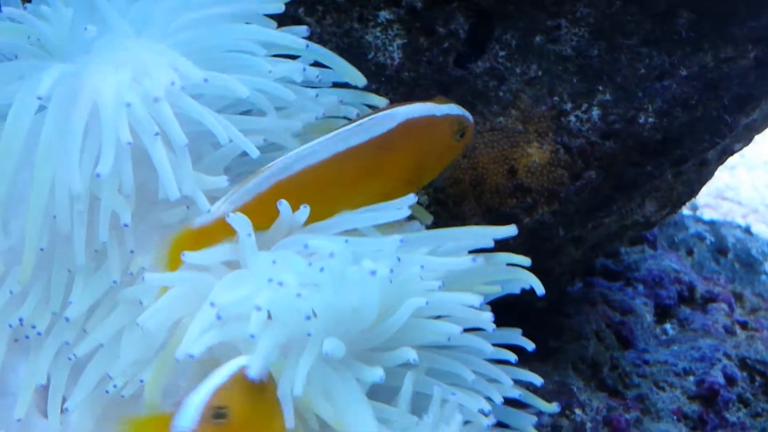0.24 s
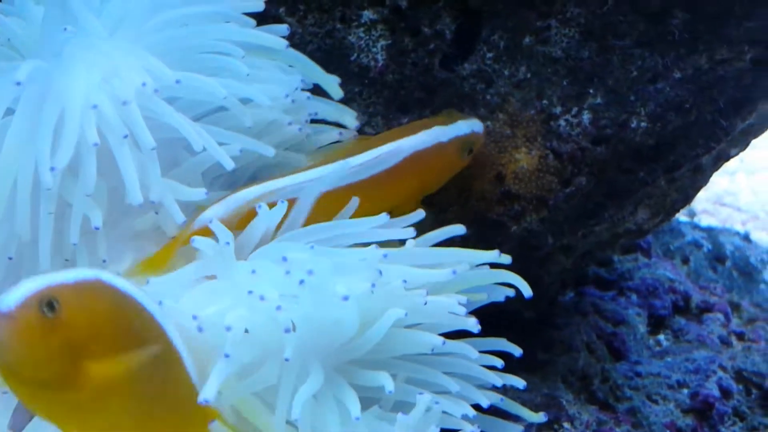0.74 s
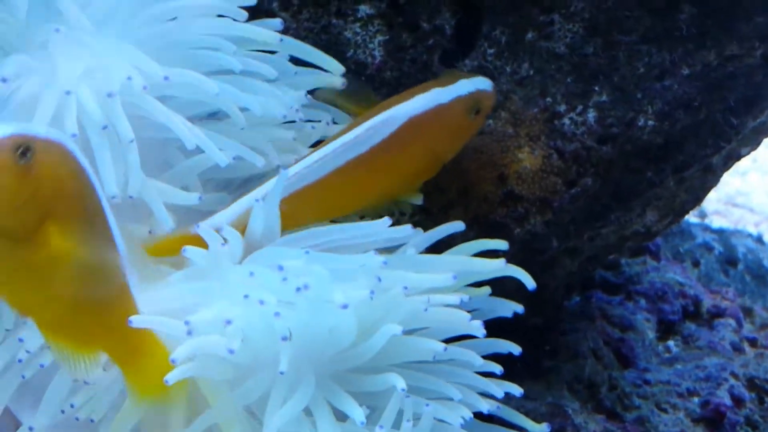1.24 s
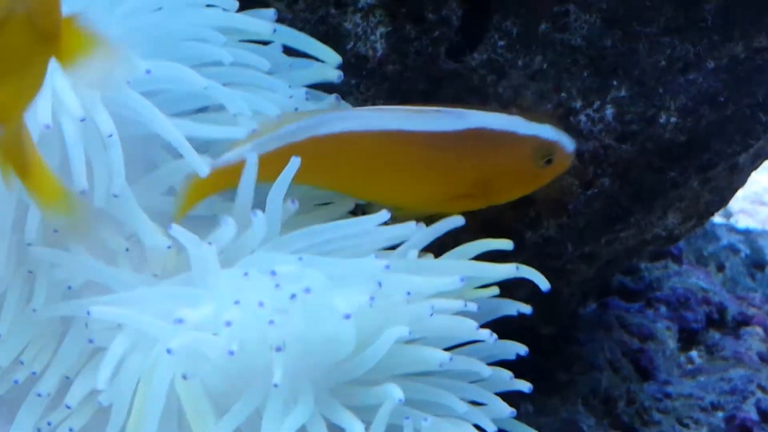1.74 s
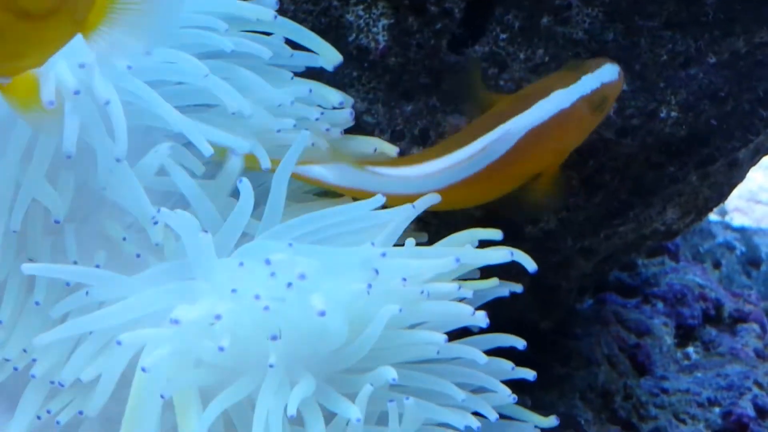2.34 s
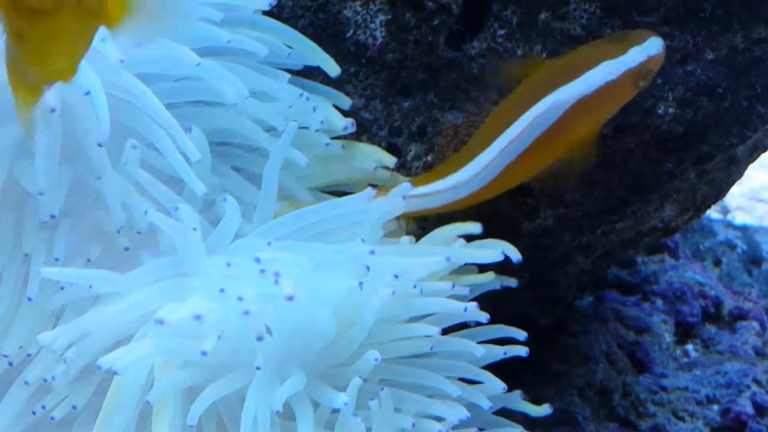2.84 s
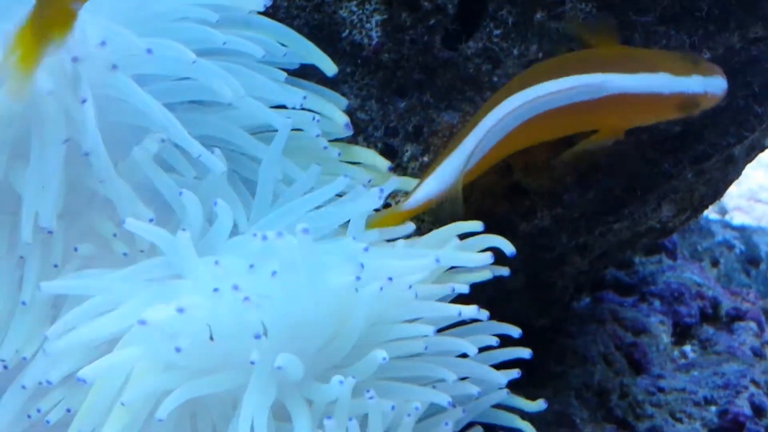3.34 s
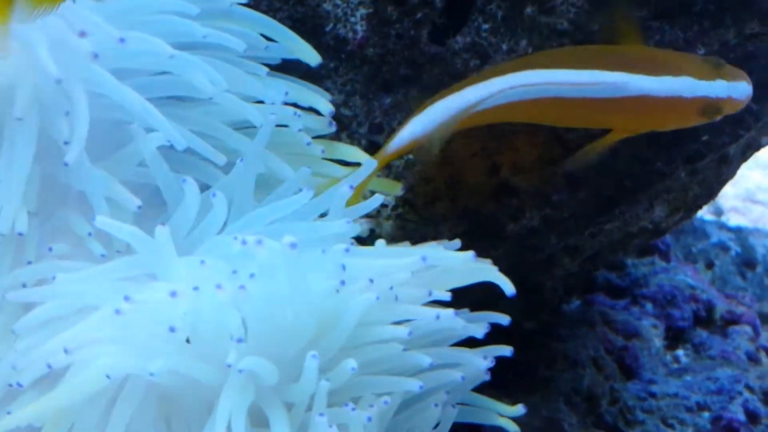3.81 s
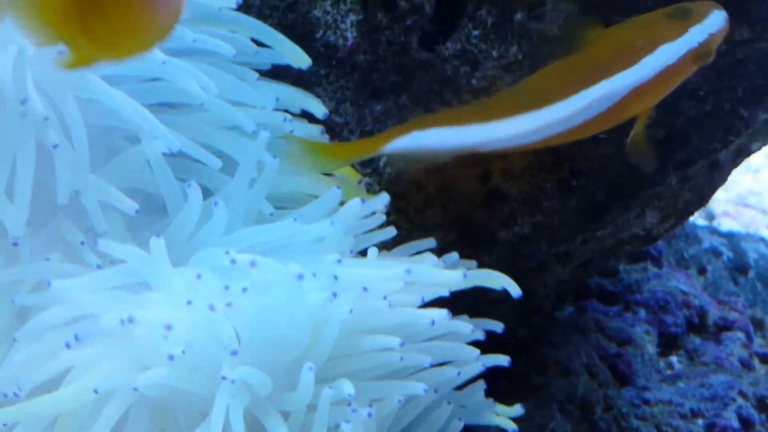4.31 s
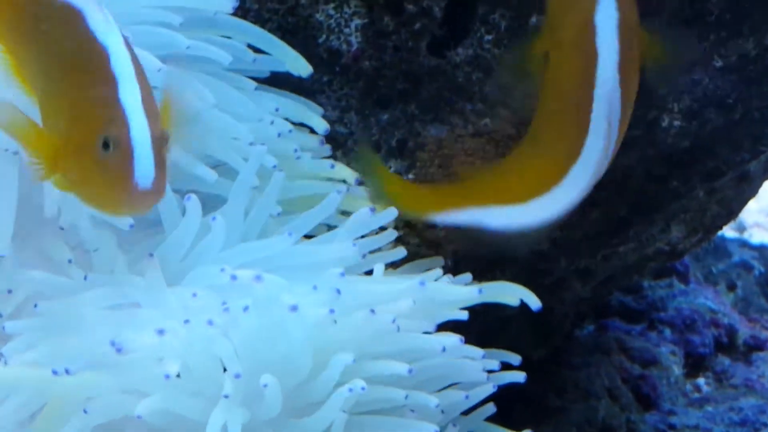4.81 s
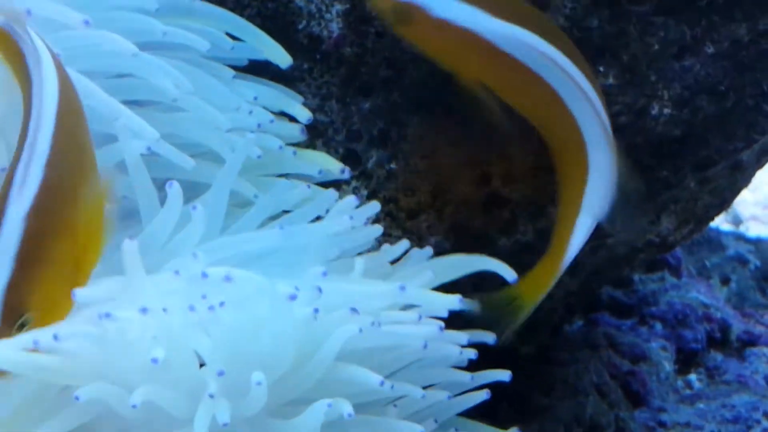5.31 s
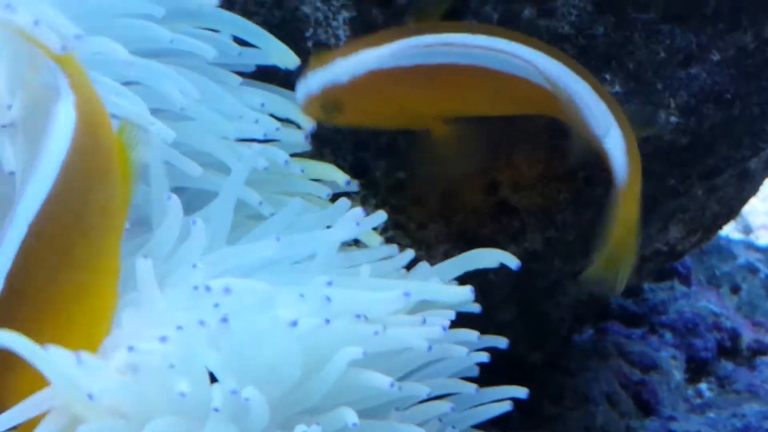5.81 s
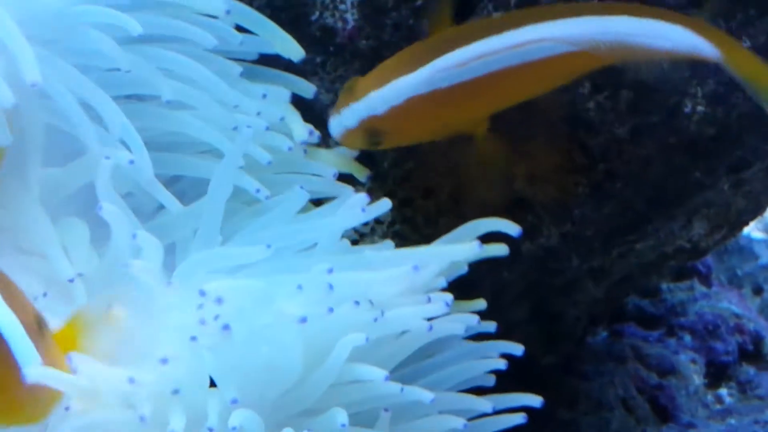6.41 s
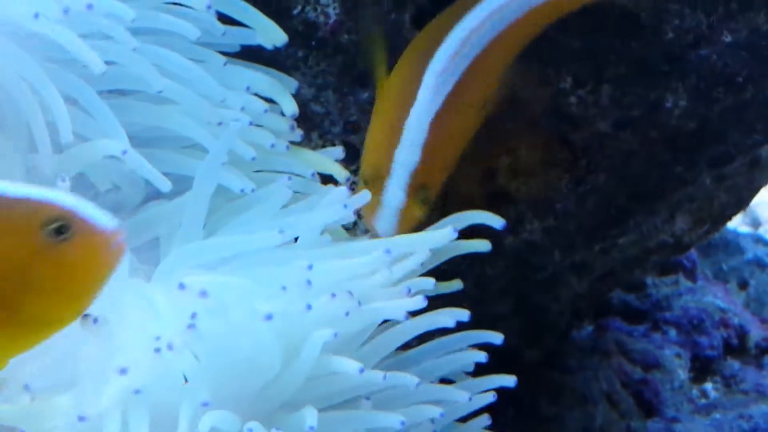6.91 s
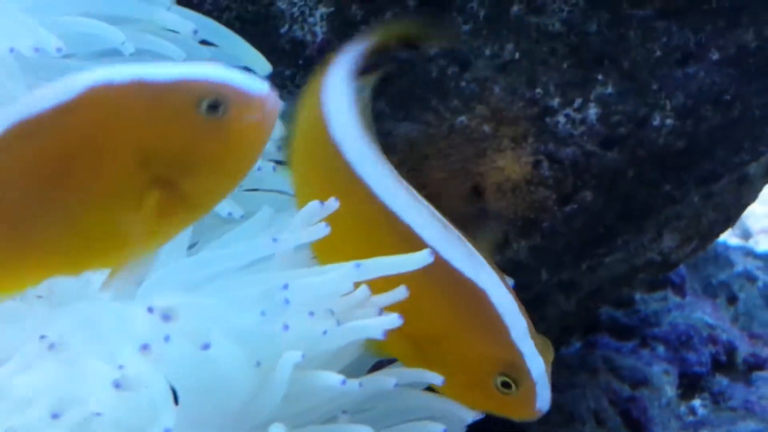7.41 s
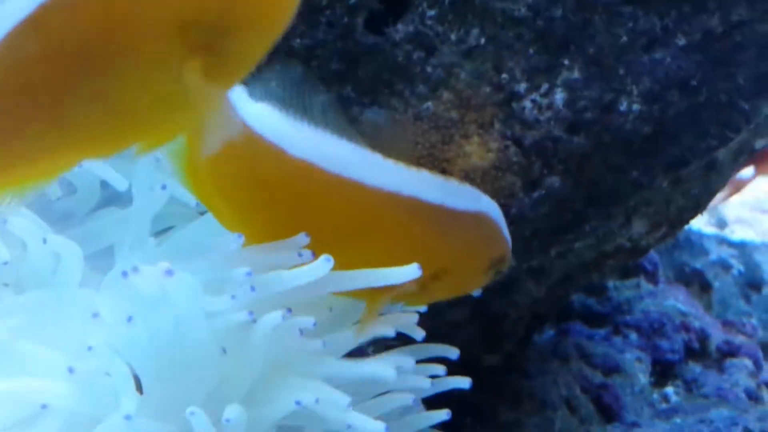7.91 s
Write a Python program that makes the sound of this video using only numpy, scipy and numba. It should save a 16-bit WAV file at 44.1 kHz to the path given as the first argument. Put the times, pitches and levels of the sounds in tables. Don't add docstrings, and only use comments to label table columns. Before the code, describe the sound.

A small indoor aquarium heard from very close to the glass. From start to end a low mains hum from the pumps runs beneath everything, throbbing quickly and unevenly as the impellers drift against each other, over soft room and cabinet rumble. Water trickles quietly as a fine, hissing fizz of tiny bubbles, with small high splashes and specks of spray scattered throughout, a little busier around 2.9 and 6.7 seconds. Sharp, dry ticks sound at irregular gaps of about a quarter second from 0.05 to 1.2, then once near 1.8. A single small drip rings at 1.6. The ticks stay away until about 3.7, then return every 0.2 to 0.4 seconds until 6.4, alternating between thin scrapes and firmer knocks, brightest on the right and hollow on the left. Afterwards only hum, throb and trickling water continue to about 8 seconds.

```python
import sys
import numpy as np
from scipy import signal
from scipy.fft import rfft, irfft, next_fast_len
from scipy.io import wavfile
from scipy.ndimage import uniform_filter1d
from numba import njit

SR = 44100
rng = np.random.default_rng(int(sys.argv[2]) if len(sys.argv) > 2 else 0)


def inscribe(sig):
    pcm = np.round(np.clip(np.atleast_2d(sig).T, -1, 1) * 32767)
    wavfile.write(sys.argv[1], SR, pcm.astype(np.int16))


def voltage_ratio(decibels):
    exponent = np.asarray(decibels, float) / 20
    return 10 ** exponent


N = 359415
BLOCK, BLOCK_START = 1024, 87

# f/Hz, left level/dB per Hz, right level/dB per Hz
RUMBLE = [(25, -92, -90), (45.3, -82, -89), (66.4, -76, -66.5), (84, -68, -72.5), (126, -71, -66),
          (205, -60.5, -59), (261, -67, -66.5), (312, -73.5, -68), (359, -73, -78.5), (487, -79.5, -74.5),
          (625, -81, -83), (784, -81.5, -80), (1100, -82.5, -82), (1600, -76, -80)]
# f/Hz, left level/dB, right level/dB, left lead/rad
HUM = [(100.0, -44.0, -46.5, -0.1), (200.0, -41.3, -40.2, -0.1), (300.0, -53.4, -51.2, -0.4),
       (400.1, -60.5, -58.9, -0.7), (500.1, -57.3, -59.0, 0.2), (600.1, -68.9, -69.8, -0.3),
       (700.2, -67.4, -72.1, -0.5), (800.2, -60.1, -63.8, -1.3), (900.2, -61.4, -68.2, -2.0),
       (1000.2, -63.6, -63.2, -1.0), (1100.2, -76.2, -65.9, 0.6), (1200.2, -72.0, -64.5, -0.8),
       (1400.3, -73.0, -75.6, -0.6), (1500.3, -80.7, -74.2, 2.2), (1600.3, -73.1, -76.9, -1.0),
       (304.7, -57.3, -57.7, -0.1), (360.1, -67.5, -67.5, -0.1), (609.6, -65.2, -69.5, -0.6),
       (1066.8, -73.2, -67.5, -0.4), (1168.6, -75.2, -84.0, -0.4), (1219.3, -65.5, -71.2, -1.8),
       (1320.7, -72.0, -72.0, -1.0), (1371.6, -58.5, -79.1, -2.8), (1422.2, -66.1, -80.1, -1.3),
       (1980.6, -77.0, -70.1, -1.4)]
# t/s, level/dB
SWELL = [(0.05, -60), (0.1, -65), (0.38, -54.5), (0.7, -61), (1.0, -55), (1.4, -63.3), (2.09, -54.5),
         (2.48, -63), (3.2, -56), (3.66, -60.5), (4.07, -54.6), (4.34, -62), (4.61, -53.5), (5.64, -68),
         (6.86, -56.5), (7.15, -63), (8.11, -57.4)]
# t/s, level/dB
THROBS = [(-0.025, -43), (0.141, -38), (0.29, -34.5), (0.48, -45), (0.585, -41.5), (0.722, -41.5),
          (0.88, -34.5), (0.994, -36.5), (1.15, -36.5), (1.285, -44), (1.429, -37.5), (1.544, -36),
          (1.8, -55), (2.023, -41), (2.18, -41), (2.299, -48), (2.411, -39), (2.551, -37.5), (2.646, -36),
          (2.776, -34), (2.932, -43), (3.052, -28.5), (3.16, -38), (3.249, -38), (3.374, -36.5),
          (3.47, -35.5), (3.651, -58), (3.807, -34), (3.899, -34.5), (4.028, -57), (4.153, -42.5),
          (4.368, -43), (4.43, -40.5), (4.616, -32.5), (4.787, -43), (4.88, -40.5), (4.989, -39),
          (5.08, -37.5), (5.214, -38), (5.338, -34), (5.465, -40.5), (5.602, -65), (5.808, -69),
          (6.04, -42), (6.175, -39.5), (6.465, -54), (6.541, -36.5), (6.757, -38.5), (6.851, -42),
          (7.018, -62), (7.163, -44), (7.249, -33.5), (7.424, -46.5), (7.505, -41), (7.589, -41.5),
          (7.767, -36), (7.877, -34), (7.991, -54), (8.085, -30.5), (8.24, -33)]
# t/s, level/dB
SLOW_LOAD = [(0.05, -37.5), (0.51, -58.5), (0.63, -35), (0.72, -53.3), (0.79, -51), (0.9, -50), (1.09, -55),
             (1.18, -52), (1.35, -44.5), (1.76, -54), (1.88, -45.5), (2.26, -61), (2.47, -39), (2.6, -52),
             (2.84, -36), (3.06, -51), (3.15, -47), (3.26, -60), (3.39, -41), (3.64, -61), (3.78, -41.5),
             (3.94, -63), (4.13, -37), (4.27, -49), (4.43, -39), (4.59, -51), (4.78, -51.8), (4.87, -55),
             (5.27, -42.5), (5.56, -45.5), (5.8, -42.5), (5.99, -53), (6.11, -43.5), (6.4, -53),
             (6.5, -52.8), (6.6, -64), (6.76, -44), (6.91, -58), (7.13, -46), (7.65, -48), (8.11, -45)]
WHIRR_HZ = (63, 140, 250, 350, 450, 551, 1450, 1980, 2350, 850, 1058)
# width/Hz, left level/dB, right level/dB
WHIRR = [(18, -71, -87), (4.97, -51.5, -54), (5.97, -59.5, -53), (3.6, -57.5, -55.5), (3.9, -59, -59.5),
         (10.3, -59, -59), (63, -59, -80), (56.7, -64, -69.5), (114, -63, -61.5), (4, -69, -70),
         (15.6, -65.5, -62)]
WHIRR_SHARE = (0, 0, .2, .4, .6, .3, 0, 0, 0, 0, 0)
# f/Hz, left level/dB per Hz, right level/dB per Hz
TRICKLE = [(1824, -87, -82), (2270, -90.5, -88), (2500, -90.5, -88.5), (3000, -92, -90), (3810, -93, -93.5),
           (4460, -87.5, -93), (4840, -89, -92.5), (5700, -85, -92.5), (6800, -89.5, -88.5),
           (6870, -93.5, -91), (8400, -99, -90.5), (11600, -102, -97.5), (14900, -106, -99),
           (15400, -108, -101)]
# t/s, level/dB
FLOW = [(0.0, -53.5), (0.82, -54.5), (1.04, -53), (1.84, -55), (2.13, -52.5), (2.43, -54.5), (3.18, -53),
        (3.81, -53), (3.95, -53), (4.27, -53), (5.31, -54.5), (6.35, -53.5), (6.45, -54.5), (8.15, -54.5)]
# t/s, f/Hz, level/dB, length/ms
SPLASHES = [(0.181, 5650, -42, 7), (0.224, 5470, -36.5, 6), (0.922, 6340, -42, 9.9),
            (1.035, 6540, -42.5, 9), (1.942, 6940, -45, 7.6), (1.994, 5900, -38.5, 20),
            (2.143, 5700, -42.5, 14), (2.648, 4400, -41, 9), (2.661, 6930, -39, 9.1),
            (2.892, 5400, -36, 14), (2.9, 3000, -40, 14), (3.065, 6500, -38, 7.8), (3.415, 4300, -46, 13),
            (3.92, 5700, -39, 7), (4.114, 4930, -42, 8.9), (4.192, 5160, -40.5, 14), (4.274, 6180, -38, 27),
            (4.38, 6370, -42, 13), (4.429, 6500, -43, 11), (4.903, 5700, -42, 6), (5.712, 6600, -40, 18),
            (5.757, 5000, -39, 4.9), (5.887, 6400, -42, 15), (5.92, 6890, -41, 23),
            (6.331, 6100, -39.5, 11), (6.445, 6500, -41, 9.7), (6.656, 6340, -42, 9.4),
            (6.753, 4340, -41, 10), (6.862, 4270, -42, 8.3), (6.861, 5570, -43.5, 11),
            (6.724, 5500, -45, 22), (2.893, 2530, -42.5, 10), (2.893, 3670, -44, 14),
            (4.118, 7800, -47, 18), (2.915, 5190, -38, 16), (6.274, 5840, -49, 11), (6.729, 4370, -44, 13),
            (7.776, 5700, -41.5, 9)]
# t/s, f/Hz, level/dB
MORE_SPLASHES = [(0.649, 8960, -46), (1.012, 9050, -48), (1.208, 7500, -45), (2.35, 9150, -47), (2.419, 10760, -47),
                 (2.459, 9990, -49), (2.583, 10400, -49), (3.036, 7870, -46), (3.289, 9700, -45),
                 (3.337, 7400, -47), (3.531, 8300, -46), (4.118, 8650, -52), (4.299, 8400, -49),
                 (4.595, 10130, -47), (4.785, 10680, -47), (4.937, 9900, -49), (5.432, 10600, -45),
                 (5.548, 9150, -44), (6.01, 7300, -46), (6.096, 7300, -46), (6.198, 9820, -47), (6.293, 8600, -45),
                 (6.41, 6500, -50), (2.897, 4200, -48), (6.757, 5600, -46), (6.799, 7400, -47), (7.1, 9300, -45),
                 (7.359, 4700, -43), (7.511, 7240, -45), (8.016, 9350, -46), (3.0235, 6570, -45),
                 (1.127, 5840, -49), (1.303, 5400, -48), (2.532, 5960, -47), (2.613, 6000, -46), (4.631, 6040, -42),
                 (4.956, 5570, -44), (5.119, 5660, -46), (6.976, 5450, -43.5), (6.91, 5800, -48), (6.80, 5900, -52),
                 (2.94, 5350, -45), (0.25, 6100, -45), (3.718, 5700, -45), (4.877, 5900, -50), (4.99, 6300, -44),
                 (6.243, 5200, -46), (3.416, 5500, -47)]
# f/Hz, left minus right level/dB
PORTS = [(3300, 5), (4200, 8), (6100, 8.5), (6700, 2.5), (7300, -1), (9500, -3)]
# t/s, f/Hz, left level/dB, right level/dB, time to fall by 60 dB/s
DRIP = (1.599, 3420, -48, -51, .21)
# t/s, energy level/dB, scrape/ms,
# slide [0 a firm knock, 1 a thin glancing scrape]
TICKS = [(0.0517, 2, 0.83, 1.15), (0.3091, 2.5, 1, 0.11), (0.595, 1.5, 0.91, 0.99), (0.8262, 2, 0.68, .03),
         (1.091, 1.5, 1, 1.3), (1.2205, 2.5, 0.78, 0.17), (1.7653, 4, 1, 0.9), (3.6703, 3, 0.47, 0.21),
         (3.9786, 2, 0.61, 0.89), (4.267, 1.5, 0.53, .1), (4.5694, 2.8, 0.99, 1.6), (4.7436, 0.5, 0.5, .03),
         (5.0127, 3, 1.3, 1.07), (5.2125, 1, 0.47, 0.13), (5.4248, 3.5, 0.72, 1.1), (5.778, 3, 0.59, .2),
         (6.049, 3, 0.7, 0.97), (6.2248, -0.1, 0.34, 0.2), (6.4317, 3, 0.67, 0.86), (1.0964, -19, .4, 1.1),
         (3.9806, -19, .4, 1.1), (6.4343, -15, .4, 1.2)]
DEAD_HZ = (11300, 8100, 13300, 8100, 12100, 9000, 3450, 9800, 12000, 8100, 13400, 9000, 4000, 9000, 10700,
           7100, 8700, 9000, 12300, 9000, 9000, 9000)
DEAD_DB = (-12, -12, -10, 0, -11, 0, -13, -5, -6, 0, -11, 0, -9, 0, -17, -3, -4, 0, -4, 0, 0, 0)
# f/Hz, firm level/dB, glancing level/dB
HOUSING = [(4000, 1, 2.5), (5000, 0, -2.5), (6500, 4.5, -0.5), (7400, -1.5, 1.5), (10600, -5.5, 0),
           (12400, 5.5, -5), (14500, -2.5, -3)]
# f/Hz, width/Hz, firm level/dB, half-glancing level/dB, glancing level/dB
HOUSING_MODES = [(4440, 440, -1, 4, -2), (5150, 240, 2, -10, -9), (5800, 410, 0.5, -1.5, 4),
                 (6000, 130, -1, 4, -5), (6500, 300, 3.5, -10, -3), (7120, 310, -3, -4, 3.5),
                 (8100, 300, -3, -11, 0.5), (8550, 280, 5.5, 2, -7), (9800, 420, 1.5, 4, -3.5),
                 (10500, 500, 0, -2, -5), (11600, 300, -0.5, 0, -2), (12500, 400, -3, 0, 0),
                 (13700, 300, 2, -8, 0), (14500, 250, 3, 0, 2)]
# f/Hz, level/dB per Hz
GATE = [(700, -106), (1600, -93), (2500, -95.5), (3400, -96.5), (4500, -100), (6000, -98), (8500, -102),
        (11000, -105), (14500, -103.5)]
# f/Hz, left share [0-1], right share [0-1]
HOLES = [(9000, 0, 0), (10500, .15, .05), (12500, .36, .25), (14500, .42, .38)]


def unit(x):
    return x / np.sqrt(np.mean(x ** 2))


def shaped(x, hz, gain):
    length = x.shape[-1]
    size = next_fast_len(length)
    every_hz = np.arange(size // 2 + 1) * SR / size
    return irfft(rfft(x, size) * np.interp(every_hz, hz, gain), size)[..., :length]


def coloured(x, table, column):
    size = next_fast_len(N)
    table = np.array(table)
    hz = np.maximum(np.arange(size // 2 + 1) * SR / size, 1)
    db = np.interp(np.log(hz), np.log(table[:, 0]), table[:, column])
    if table[0, 0] > 1000:
        edge = np.minimum(1, (hz / table[0, 0]) ** 8)
    else:
        edge = np.minimum(1, (table[-1, 0] / hz) ** 8)
    return irfft(rfft(x, size) * voltage_ratio(db) * edge, size)[..., :N] * np.sqrt(SR / 2)


def band(x, hz, width):
    edges = [hz - width / 2, min(hz + width / 2, .45 * SR)]
    return signal.sosfilt(signal.butter(2, edges, "band", fs=SR, output="sos"), x)


def walk(rate):
    hold = int(SR / rate)
    steps = np.repeat(rng.standard_normal(N // hold + 1), hold)
    return uniform_filter1d(uniform_filter1d(steps, hold), hold)[:N]


def swelling(table, share=1):
    db = np.interp(np.arange(N) / SR, *np.transpose(table))
    return unit(voltage_ratio(share * uniform_filter1d(db, size=5000)))


def steadied(x, size=2200):
    return unit(x / np.sqrt(uniform_filter1d(np.abs(x), size) + 1e-9))


def rumble():
    left_lag = 8
    size = next_fast_len(N)
    hz = np.arange(size // 2 + 1) * SR / size
    alike = .98 / (1 + (hz / 1160) ** 2.7)
    mid, side = rfft(rng.standard_normal((2, size)))
    mid = irfft(mid * np.sqrt((1 + alike) / 2), size)
    side = irfft(side * np.sqrt((1 - alike) / 2), size)
    left = coloured(np.roll(mid, left_lag) + side, RUMBLE, column=1)
    right = coloured(mid - side, RUMBLE, column=2)
    return np.array([left, right])


def whirr():
    out = np.zeros((2, N))
    for hz, (width, left_db, right_db), share in zip(WHIRR_HZ, WHIRR, WHIRR_SHARE):
        alike = 1 / (1 + (hz / 770) ** 4)
        mid, side = rng.standard_normal((2, N))
        noise = np.sqrt((1 + alike) / 2) * mid + np.sqrt((1 - alike) / 2) * side * np.array([[1], [-1]])
        out += voltage_ratio([[left_db], [right_db]]) * steadied(band(noise, hz, width)) * swelling(SLOW_LOAD, share)
    return out


def slow_impeller():
    mean_hz, wander_hz, pace = 150.05, .2, 7
    flutter_db, trim_db, pan_db = .5, -.5, -3.5
    hz = mean_hz + wander_hz * walk(pace)
    load_db = np.interp(np.arange(N) / SR, *np.transpose(SLOW_LOAD))
    db = uniform_filter1d(load_db, size=3000) + trim_db + flutter_db * walk(pace)
    tone = np.sin(2 * np.pi * np.cumsum(hz) / SR)
    return np.sqrt(2) * voltage_ratio(db + np.array([[pan_db], [-pan_db]]) / 2) * tone


def pumps():
    t, out = np.arange(N) / SR, np.zeros((2, N))
    drift = 0.2 * walk(1.703)
    turns = rng.uniform(0, 2 * np.pi, len(HUM))
    for (hz, left_db, right_db, lead), turn in zip(HUM, turns):
        phase = 2 * np.pi * hz * t + turn + hz / 200 * drift
        fade = swelling(SWELL) if round(hz) == 500 else 1
        tone = np.sin(phase + np.array([[lead], [0]]))
        out += np.sqrt(2) * fade * voltage_ratio([[left_db], [right_db]]) * tone
    s, db = np.transpose(THROBS)
    mains = 2 * np.pi * HUM[1][0] * t + turns[1] + drift
    gained = 2 * np.pi * uniform_filter1d(np.interp(t, s, np.arange(len(s))), size=1300)
    throb_db = np.interp(t, s, db) + np.array([[-1], [1]])
    out += np.sqrt(2) * voltage_ratio(throb_db) * np.sin(mains + gained)
    return out + slow_impeller() + whirr()


@njit
def bubbles(start, hz, cycles, size, glide, length):
    out = np.zeros(length)
    for k in range(len(start)):
        n = int(cycles[k] * SR / hz[k] * 3)
        phase, step = 0., 2 * np.pi * hz[k] / SR
        for i in range(min(n, length - start[k])):
            phase += step * (1 + glide * i / n)
            out[start[k] + i] += size[k] * np.exp(-6. * i / n) * np.sin(phase)
    return out


def trickle(count=30000):
    s, db = np.transpose(FLOW)
    flow_db = np.interp(np.arange(N) / SR, s, db - db.mean())
    start, pitch, ring, size = rng.random((count, 4)).T
    hz = 1500 + 13000 * pitch
    loud = voltage_ratio(-3.0 * np.log(np.maximum(size, .03))) * np.sqrt(hz)
    centres = 1500 * 1.35 ** np.arange(9)
    shared = [walk(16) for _ in centres]
    out = []
    for column in (1, 2):
        lag = rng.integers(0, 120, count)
        first = (start * (N - 200)).astype(int) + lag
        fizz = bubbles(first, hz, 6.0 + 16.0 * ring, loud, 0.33, N)
        water = 0.53 * unit(fizz) + 0.89 * rng.standard_normal(N)
        patches = np.zeros(N)
        for centre, one, flicker in zip(centres, np.eye(9), shared):
            patch_db = 1.17 * flicker + walk(30) + min(centre / 5000, 1) * flow_db
            patches += shaped(water, centres, one) * voltage_ratio(patch_db) ** min(8000 / centre, 1)
        out.append(coloured(unit(patches), TRICKLE, column))
    return voltage_ratio(1.5) * np.array(out)


def splashes(count=36):
    more_ms = 9.5
    rows = SPLASHES + [(*row, more_ms) for row in MORE_SPLASHES]
    s, hz, peak_db, ms = np.array(rows).T[:, :, None]
    lean_db = np.interp(hz, *np.transpose(PORTS))
    left_db, right_db = peak_db + np.minimum(lean_db, 0), peak_db - np.maximum(lean_db, 0)
    out = []
    for db in (left_db, right_db):
        late, spread, ring = rng.random((len(s), count, 3)).transpose(2, 0, 1)
        late[:, :4] *= .1
        spread[:, :4] = .3 + .4 * spread[:, :4]
        delay = -1.9 * ms / 1000 * np.log(1 - 0.7 * late)
        start = (np.maximum(s - .001 + delay, 0) * SR).astype(int)
        off = 2 * spread - 1
        pitch = hz * (1 + (.13 + .27 * late) * off * np.abs(off))
        cycles = (9.6 + 48.0 * ring) * np.minimum(hz / 5200, 1) ** 1.4
        size = voltage_ratio(db + 0.3 - 13 * late)
        out.append(bubbles(start.ravel(), pitch.ravel(), cycles.ravel(), size.ravel(), 0.162, N))
    out[0] = 0.62 * out[0] + 0.59 * band(out[0], 5750, 900)
    return np.array(out)


def drip():
    s, hz, left_db, right_db, t60 = DRIP
    age = np.maximum(np.arange(N) / SR - s, 0)
    tone = np.sin(2 * np.pi * (hz * age + np.exp(-age / .007) + .45 * walk(90)))
    beat = 1 + .7 * np.cos(2 * np.pi * 44 * age - 3.3)
    rise = np.minimum(age / .008, 1)
    fall = voltage_ratio(-60 * age / t60) + .18 * voltage_ratio(-18 * age / t60)
    return voltage_ratio([[left_db], [right_db]]) * tone * beat * rise * fall


def even(x, size=5):
    tone = rfft(x)
    return irfft(tone / uniform_filter1d(np.abs(tone), size) ** 0.95, len(x))


def housing(x, slide, dead_hz, dead_db):
    hz, firm_db, glancing_db = np.transpose(HOUSING)
    every = np.arange(len(x) // 2 + 1) * SR / len(x)
    db = np.interp(every, hz, firm_db + slide * (glancing_db - firm_db))
    db = db + dead_db * np.exp(-((every - dead_hz) / 400) ** 2)
    for centre, width, firm, half, glancing in HOUSING_MODES:
        mode_db = np.interp(slide, (.3, .65, .85, .95), (firm, half, half, glancing))
        db = db + mode_db * np.exp(-((every - centre) / width) ** 2)
    fold = irfft(db * np.log(10) / 20, len(x))
    fold[1:len(x) // 2] *= 2
    fold[len(x) // 2 + 1:] = 0
    return irfft(rfft(x) * np.exp(rfft(fold)), len(x))


def gritty_scrape(age, ms, lead):
    grit = rng.standard_normal((2, len(age)))
    scrape = grit * (age / (0.32 * ms)) * np.exp(-(age / (0.89 * ms)) ** 2.0)
    scrape += 0.08 * grit * (age > 0) * np.exp(-age / 3.7)
    scrape[0, lead + int(.6 * ms * SR / 1000)] += 2.75 / ms
    scrape[0] = even(scrape[0])
    return scrape


def ticks(size=512, lead=100):
    firm_hz, glancing_hz, cavity_width = 6900, 6000, 1200
    bright_db = -1.22
    out = np.zeros((2, N + size))
    age = np.maximum(np.arange(size) - lead, 0) / SR * 1000
    onset = np.clip((np.arange(size) - lead + 12) / 14, .1, 1)
    for (s, db, ms, slide), dead_hz, dead_db in zip(TICKS, DEAD_HZ, DEAD_DB):
        glance = np.clip(slide, 0, 1.3)
        thud_db = -13.5 + glance * (-36 + 13.5)
        left_db = -11.5 + glance * (-17.5 + 11.5)
        near, far = gritty_scrape(age, ms, lead)
        thin = 40 * max(-thud_db - 27.5, 0)
        thud = shaped(near, (1900, 3600, 4600), (0, 1, 0))
        body = shaped(near, (3600 + thin, 4600 + thin, 8800, 10000), (0.044, 0.8, 0.6, 0.045))
        bright = shaped(near, (8800, 10000), (0, 1))
        casing = shaped(near, (250, 600, 1500, 2400), (0.44, 0.75, 0.38, 0.022))
        knock = voltage_ratio(-20) * unit(casing)
        body_db = 10 * np.log10(max(1 - voltage_ratio(2 * thud_db) - voltage_ratio(2 * bright_db), .1))
        right = voltage_ratio(thud_db) * unit(thud) + voltage_ratio(body_db) * unit(body) + voltage_ratio(bright_db) * unit(bright) + knock
        right = unit(housing(right * onset, slide, dead_hz, dead_db))
        right = right + 0.18 * max(1 - slide, 0) * unit(band(right, firm_hz, cavity_width / 2))
        inside = 0.13 * np.roll(unit(near), 8) + 3.3 * np.roll(unit(far), 16)
        left = band(inside, firm_hz + slide * (glancing_hz - firm_hz), cavity_width)
        left = voltage_ratio(left_db) * unit(left) + voltage_ratio(-29) * np.roll(right, 5) + 0.2 * knock
        i = int((s - .0002) * SR) - lead
        out[:, i:i + size] += voltage_ratio(db - 1.0) / np.sqrt(size) * np.array([left, right])
    return out[:, :N]


def scene():
    return rumble() + pumps() + trickle() + splashes() + drip() + ticks()


def lapped(x):
    n, k = np.arange(2 * BLOCK), np.arange(BLOCK)
    window = np.sin(np.pi * (n[:, None] + .5) / (2 * BLOCK))
    cosines = np.cos(np.pi / BLOCK * np.outer(n + .5 + BLOCK / 2, k + .5))
    basis = window * cosines * np.sqrt(2 / BLOCK)
    pad = 2 * BLOCK - BLOCK_START
    x = np.pad(x, ((0, 0), (pad, 3 * BLOCK - (N + pad) % BLOCK))).reshape(2, -1, BLOCK)

    def back(lines):
        halves = lines @ basis.T
        joined = halves[:, 1:, :BLOCK] + halves[:, :-1, BLOCK:]
        return joined.reshape(2, -1)[:, pad - BLOCK:pad - BLOCK + N]
    return np.concatenate([x[:, :-1], x[:, 1:]], axis=2) @ basis, back


def top_cut(x):
    return signal.sosfilt(signal.butter(12, 16500, fs=SR, output="sos"), x)


def record(dry, size=8):
    lines, back = lapped(shaped(dry, (14450, 14750, 15600, 16500), (1, .05, .015, 0)))
    hz = (np.arange(BLOCK) + .5) * SR / 2 / BLOCK
    bands = (*lines.shape[:2], BLOCK // size)
    waver_db = 2.8 * np.repeat(rng.standard_normal(bands), size, axis=2)
    limit_db = np.interp(hz, *np.transpose(GATE)) + waver_db
    faint = np.abs(lines) < voltage_ratio(limit_db) * np.sqrt(SR)
    luck = np.repeat(rng.random(bands), size, axis=2)
    luck = np.minimum(luck, 2 * np.roll(luck, 1, axis=1))
    luck = np.minimum(luck, 4 * luck[::-1])
    edge, *shares = np.transpose(HOLES)
    hole = luck < np.array([np.interp(hz, edge, share) for share in shares])[:, None]
    struck = (np.array(TICKS)[:, 0] * SR + 2 * BLOCK - BLOCK_START).astype(int) // BLOCK
    calm = ~np.isin(np.arange(lines.shape[1]), [struck, struck - 1])
    lost = (faint | hole | (hz > 14700)) & calm[:, None]
    mix = back(lines * ~lost) - .0005
    return top_cut(mix)


dry = scene()
out = record(dry)
inscribe(out)
```